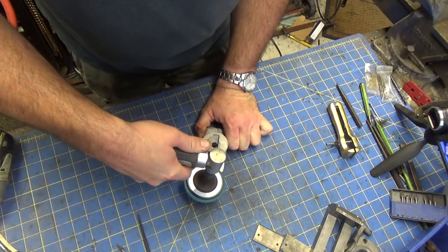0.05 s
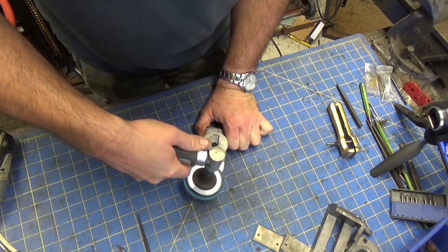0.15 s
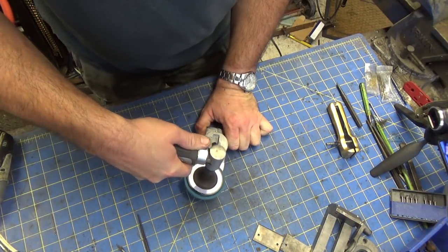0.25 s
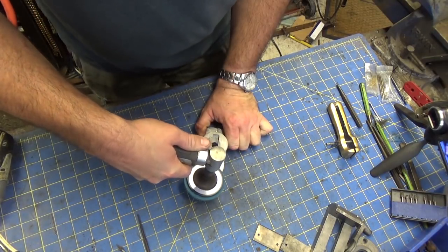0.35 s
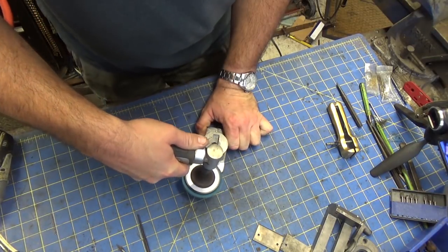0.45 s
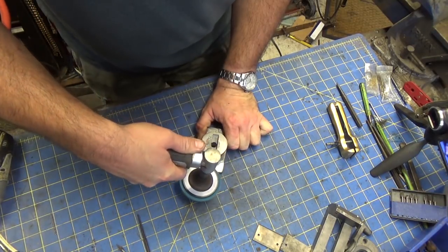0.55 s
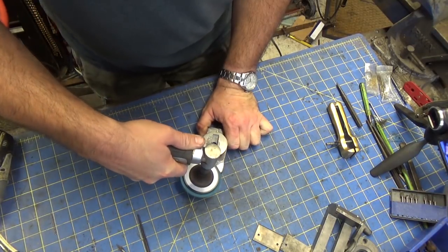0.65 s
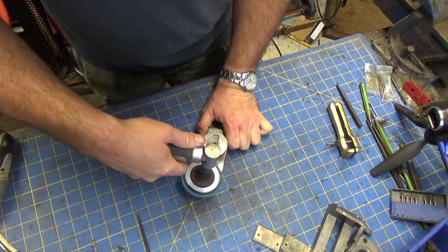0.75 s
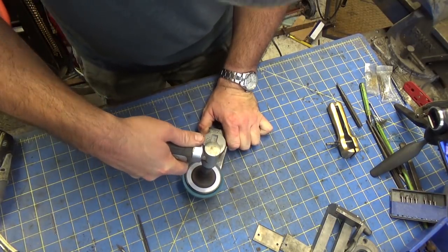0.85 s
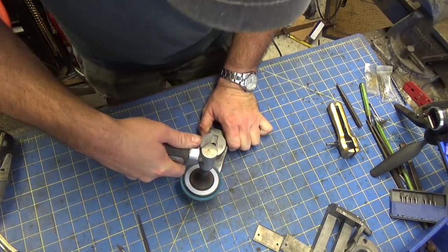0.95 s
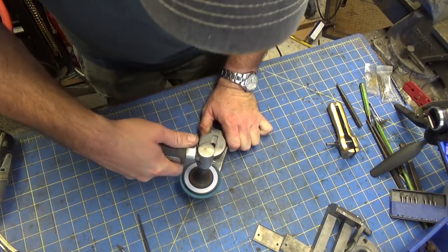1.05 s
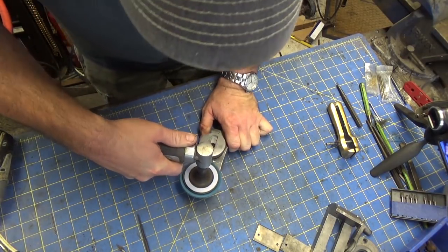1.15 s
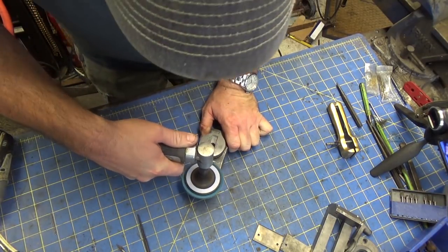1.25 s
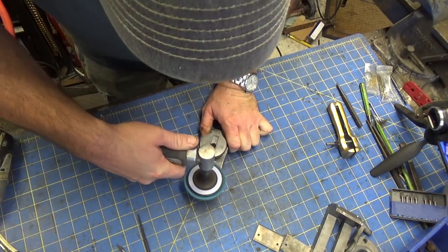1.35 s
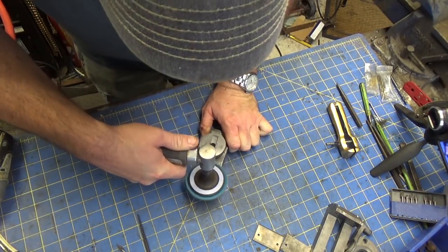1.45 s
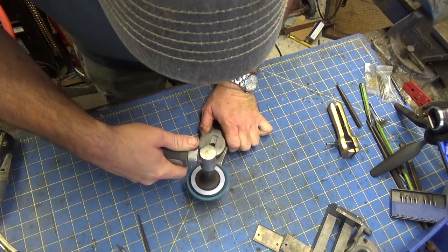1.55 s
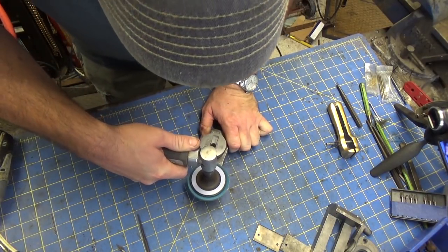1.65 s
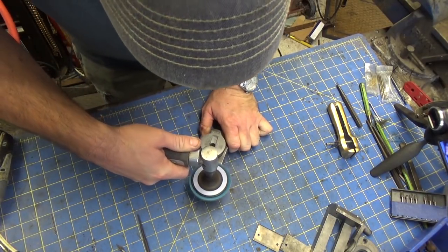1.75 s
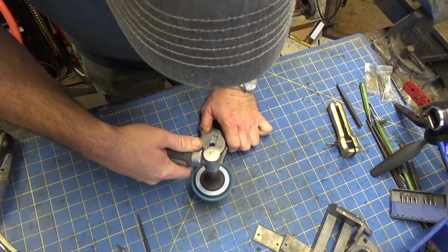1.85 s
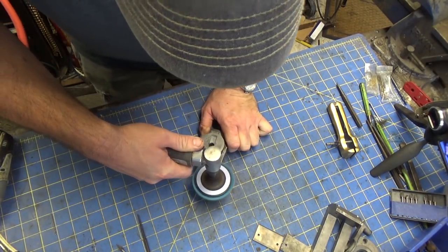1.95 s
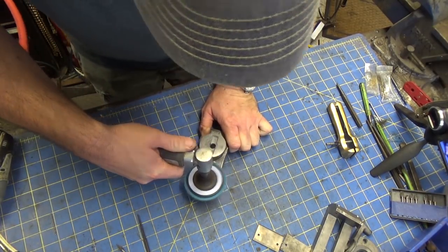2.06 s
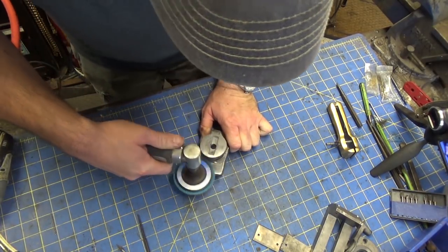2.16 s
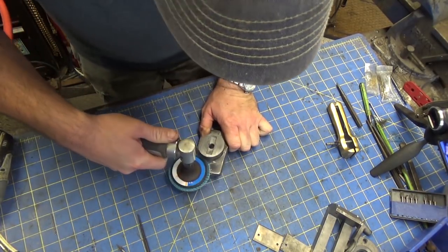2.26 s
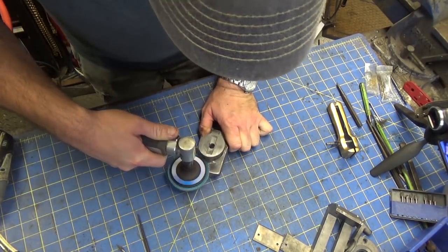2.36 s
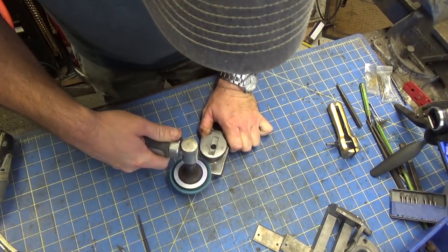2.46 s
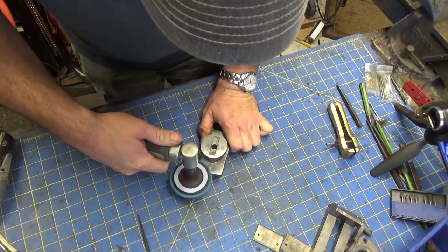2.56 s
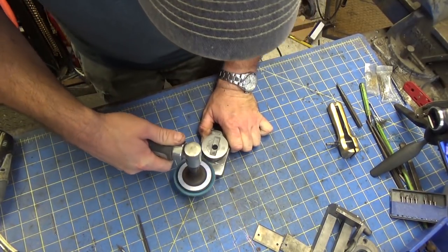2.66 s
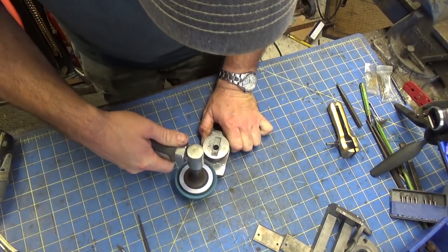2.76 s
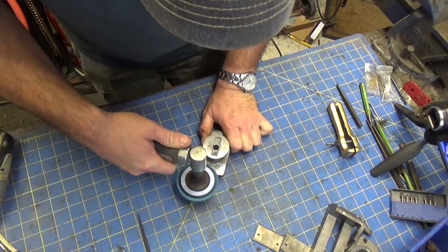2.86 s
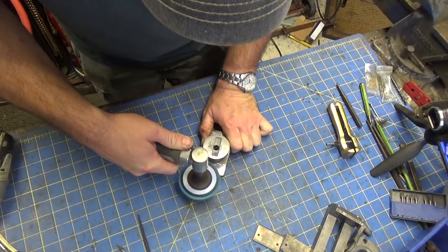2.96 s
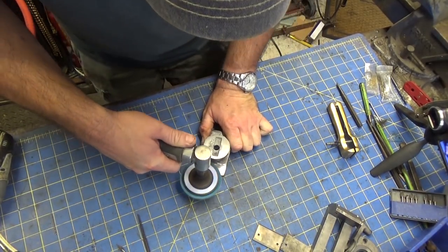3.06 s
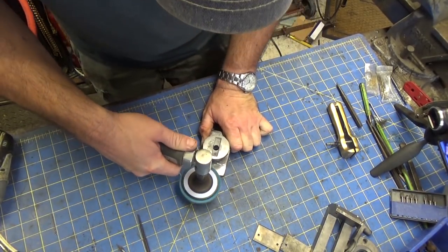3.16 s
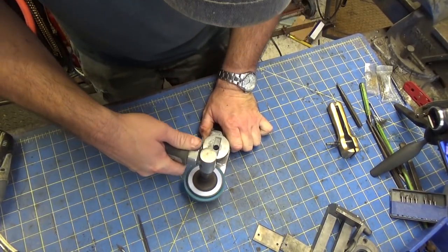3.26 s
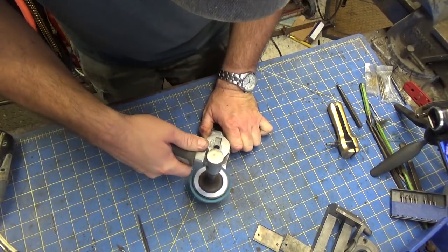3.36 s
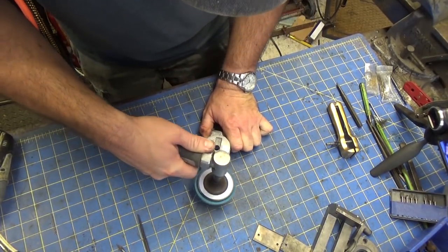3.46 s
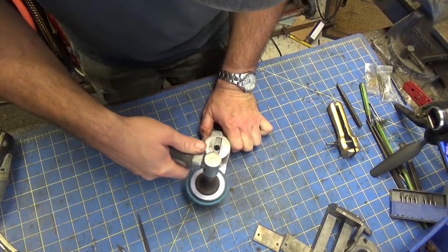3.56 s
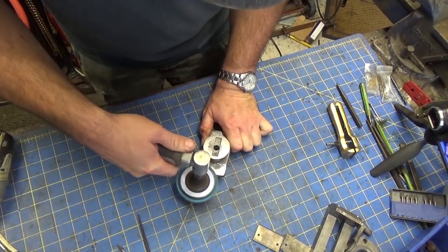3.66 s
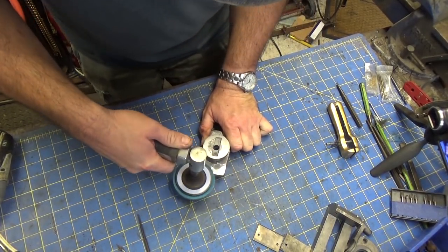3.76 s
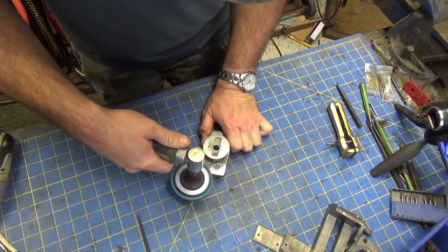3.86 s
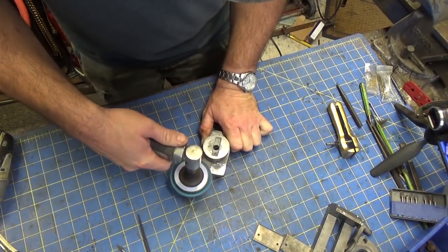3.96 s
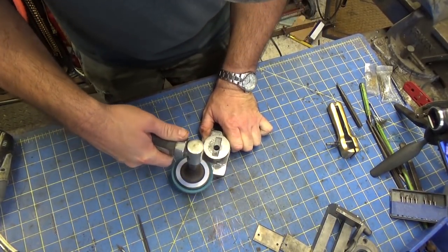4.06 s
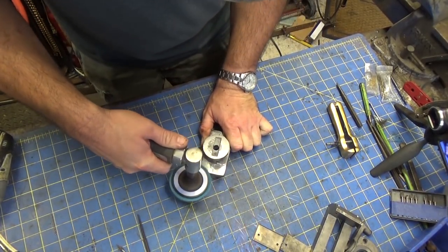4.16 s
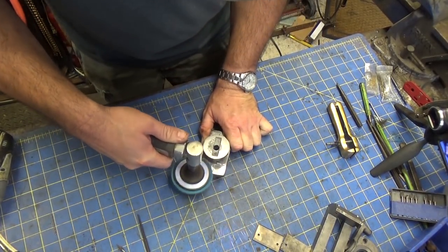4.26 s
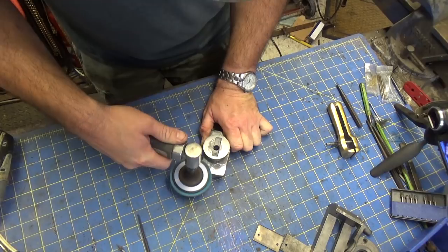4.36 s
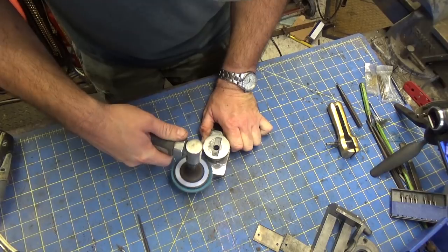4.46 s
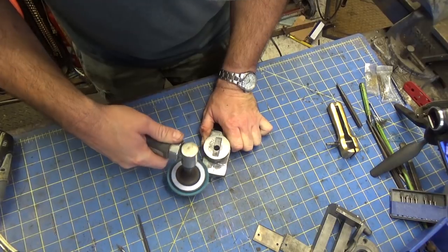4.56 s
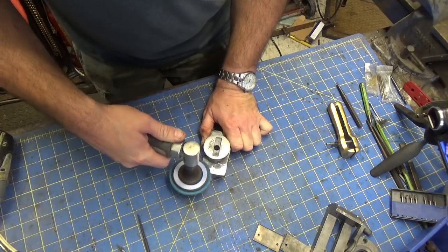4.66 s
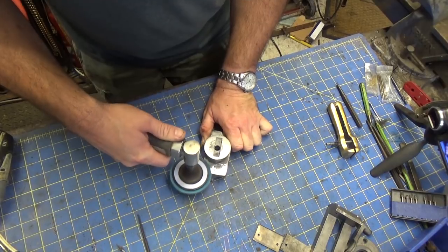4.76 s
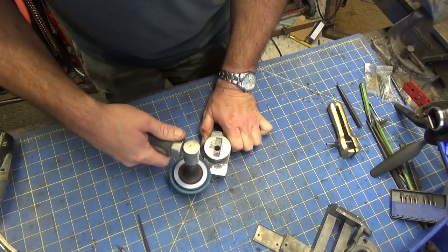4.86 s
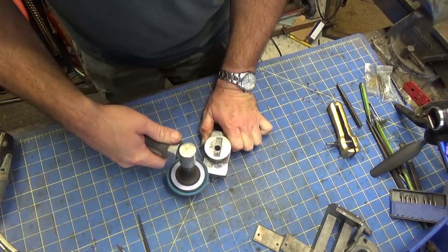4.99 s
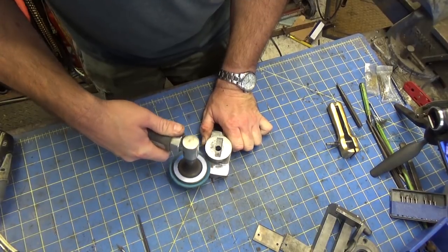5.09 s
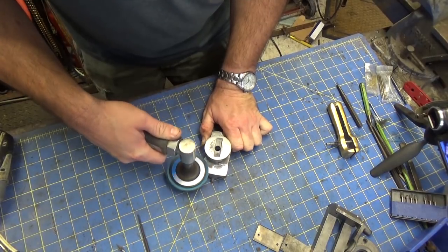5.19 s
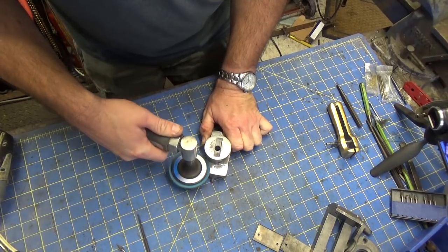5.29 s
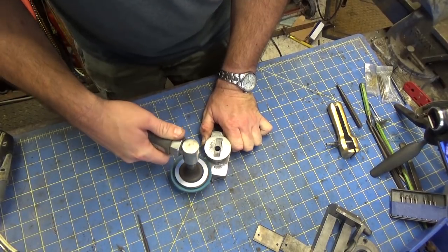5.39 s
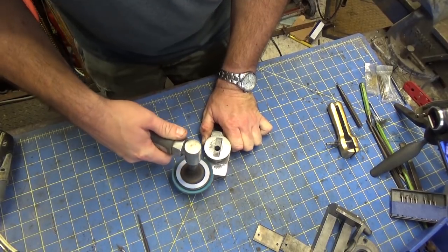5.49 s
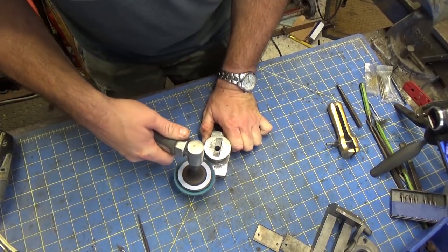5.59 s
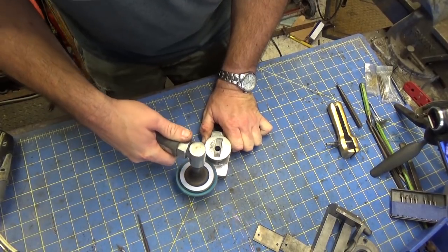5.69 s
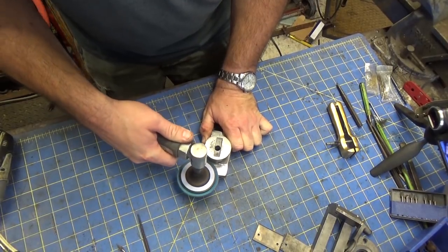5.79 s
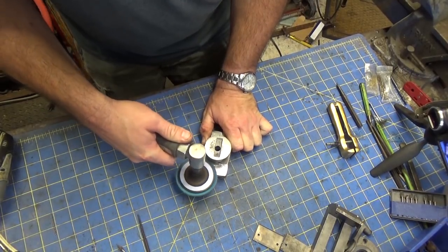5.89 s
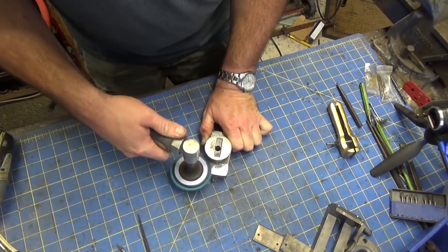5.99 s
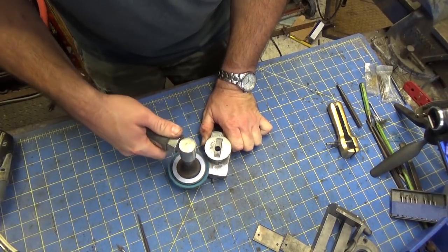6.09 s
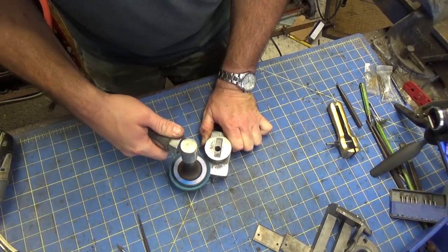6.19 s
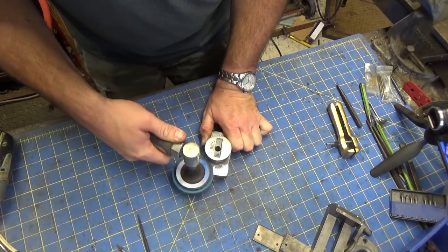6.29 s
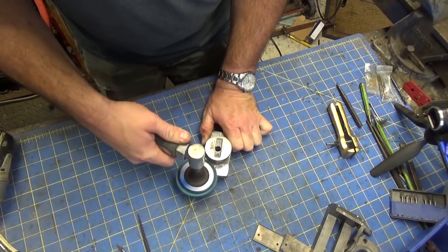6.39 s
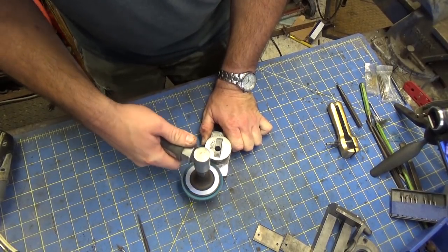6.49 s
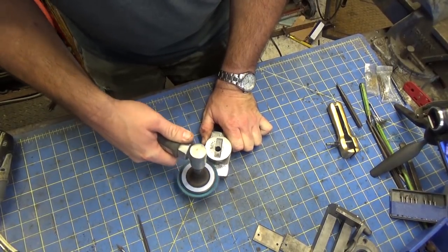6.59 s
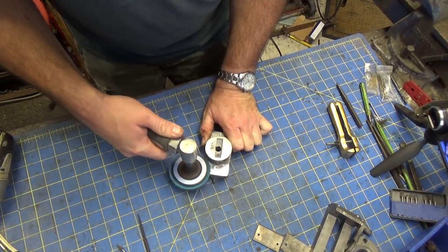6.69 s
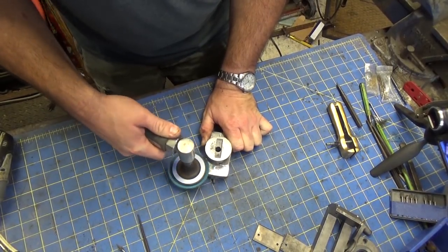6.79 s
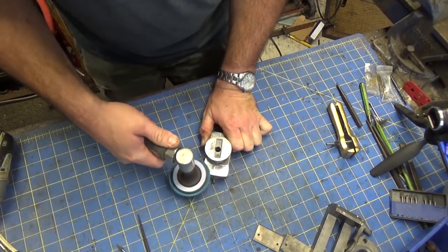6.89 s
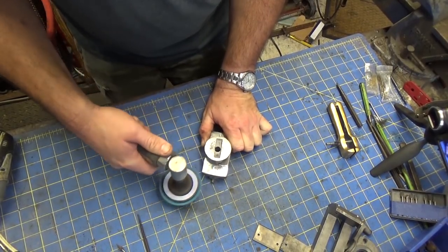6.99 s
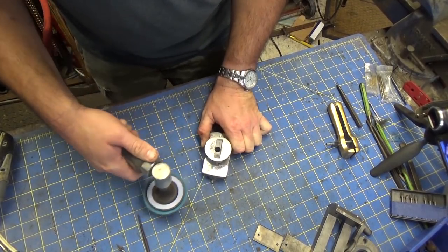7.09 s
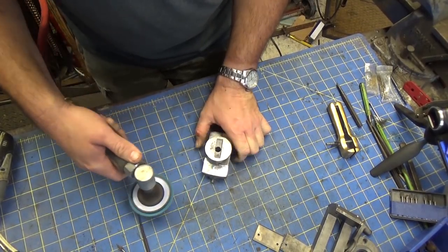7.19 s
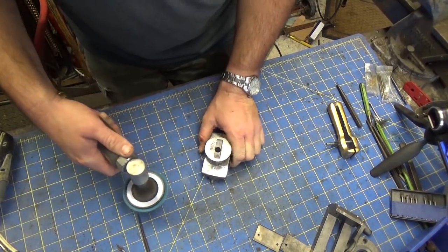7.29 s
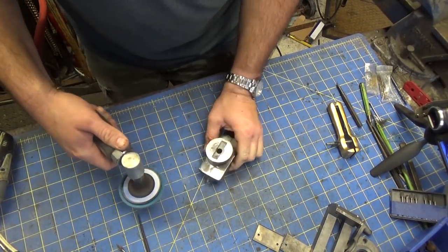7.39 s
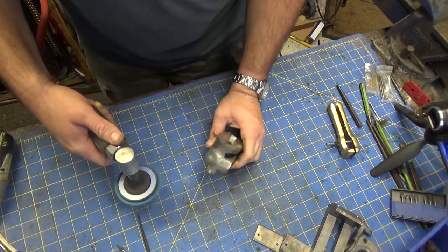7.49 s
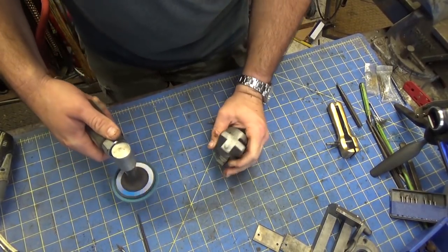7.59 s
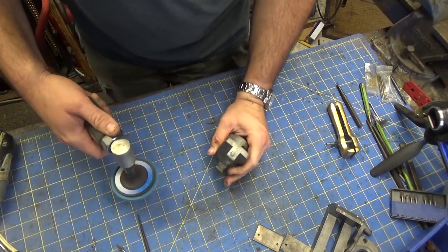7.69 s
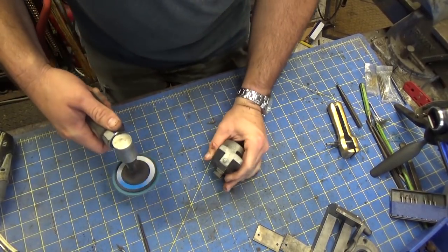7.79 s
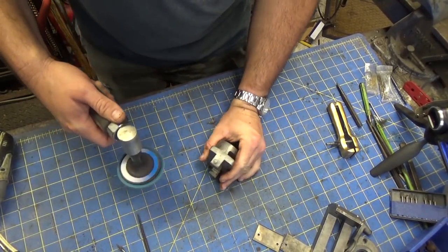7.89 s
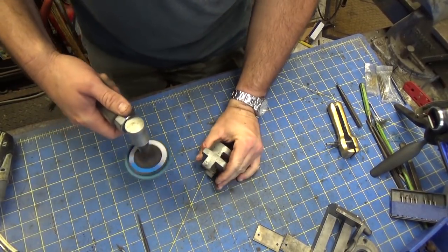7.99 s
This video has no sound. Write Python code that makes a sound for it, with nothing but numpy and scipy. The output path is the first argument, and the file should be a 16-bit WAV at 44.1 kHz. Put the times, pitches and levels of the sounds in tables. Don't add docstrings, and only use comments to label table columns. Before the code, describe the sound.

From 0 s an air grinder is already running close to the microphones on a workshop bench: a dominant, bright, broad hiss of exhaust with a midrange whine beneath. The pitch drops sharply around 0.3 s, recovers by about 1 s, then sags again near 1.5 to 1.8 s. A deep, labouring plunge comes at 2.3 s, with shallower wavering from 2.5 to 4.7 s. Another heavy plunge hits at 5.2 s, then more quick dips from 6.2 to 7 s. Gritty metal scouring accompanies this, over low rumble and soft bench shakes. The hiss shifts subtly in colour as hands move. At about 7.1 s the air shuts off suddenly, with a short bleed of hose air. The whine glides downward and fades, with airy disc whir, a brief ring near 7.35 s and increasingly distinct small vane ticks until 8 s, as quiet workshop rumble remains.

```python
import sys
import numpy as np
from scipy import signal
from scipy.fft import rfft, irfft
from scipy.io import wavfile
from scipy.ndimage import uniform_filter1d, map_coordinates

SR = 44100
rng = np.random.default_rng(int(sys.argv[2]) if len(sys.argv) > 2 else 0)


def waveform_to_disk(signal):
    frames = np.transpose(np.atleast_2d(signal))
    scaled = np.clip(frames, -1, 1) * 32767
    samples = np.round(scaled).astype(np.int16)
    wavfile.write(sys.argv[1], SR, samples)


def gain_from_db(level_db):
    decades = np.asarray(level_db, float) / 20
    return 10 ** decades


N = 354547
T = np.arange(N) / SR
RELEASE_S = 7.11
WHINE_DB, CUT_DB = -34.5, -30.5


def unit(x):
    return x / np.sqrt(np.mean(x ** 2) + 1e-20)


def along(points, hz):
    f, v = np.transpose(points)
    return np.interp(np.log(hz + 1), np.log(f + 1), v)


def curves(rows, t=T):
    s, *cols = np.transpose(rows)
    return [np.interp(t, s, c) for c in cols]


def bump(x, centre, width):
    return np.exp(-((x - centre) / width) ** 2)


def spots(rows, hz, t):
    return sum(db * bump(t, s, length) * bump(hz, centre_hz, width)
               for s, length, centre_hz, width, db in rows)


def wobble(rate):
    knots = rng.standard_normal(int(N / SR * 400))
    return map_coordinates(knots, [T * min(rate, 390)])


def patches(shape, bins, frames):
    field = rng.standard_normal(shape)
    for axis, size in enumerate([bins, frames]):
        field = uniform_filter1d(field, size, axis)
        field = uniform_filter1d(field, size, axis)
    return unit(field)


# frequency_hz, side_minus_mid_db
STEREO_SPREAD = [(60, -26), (99, -22), (160, -17), (270, -10), (450, -12), (740, -4.5), (1220, -5.5),
                 (2010, -12), (3330, -20.5), (5500, -13), (9080, -17.5), (15000, -34.5)]


def rush(spectrum, shading=lambda hz, t: 0, ripple_db=2, patchy_db=1.5):
    hz, t, z = signal.stft(rng.standard_normal((2, N)), SR, nperseg=1024)
    hz = hz[:, None]
    ripple = ripple_db * patches(z.shape[1:], bins=2, frames=60)
    ripple = ripple + patchy_db * patches(z.shape[1:], bins=8, frames=20)
    z = z * gain_from_db(along(spectrum, hz) + ripple)
    z = z * [np.ones_like(hz), gain_from_db(along(STEREO_SPREAD, hz))]
    scale = np.sqrt(np.mean(signal.istft(z[0], nperseg=1024)[1] ** 2))
    mid, side = signal.istft(z * gain_from_db(shading(hz, t)), nperseg=1024)[1][:, :N] / scale
    return np.array([mid + side, mid - side])


# peak_s, sag_semitones, lean_in_s, let_up_s
PRESSES = [(0.141, 9.1, 0.201, 0.082), (0.292, 13.5, 0.15, 0.033), (0.356, 16.8, 0.055, 0.28),
           (0.509, 6.6, 0.025, 0.34), (0.92, 2.16, 0.103, 0.58), (1.564, 9.5, 0.166, 0.11),
           (1.775, 5.25, 0.071, 0.15), (2.134, 6.53, 0.65, 0.087), (2.281, 23.3, 0.096, 0.32),
           (2.316, 19.1, 0.036, 0.14), (2.493, 6.75, 0.022, 0.074), (2.92, 3.92, 0.185, 0.073),
           (3.164, 5, 0.144, 0.068), (3.263, 5.8, 0.071, 0.36), (3.774, 3.49, 0.108, 0.35),
           (4.169, 1.82, 0.055, 0.65), (4.694, 2.95, 0.14, 0.036), (4.875, 5.6, 0.162, 0.068),
           (5.123, 11.2, 0.2, 0.045), (5.217, 25.8, 0.047, 0.267), (5.414, 6.83, 0.155, 0.036),
           (5.536, 9.9, 0.111, 0.27), (5.86, 4.24, 0.09, 0.19), (6.122, 4.35, 0.114, 0.073),
           (6.231, 10.3, 0.108, 0.023), (6.273, 17.5, 0.034, 0.24), (6.489, 10.8, 0.129, 0.23),
           (6.774, 8.3, 0.097, 0.052), (6.878, 13.49, 0.084, 0.064), (7.001, 8.9, 0.097, 0.07)]


def rotor():
    free_hz, stall_hz = 700, 119.9
    stall_db, spent_db = -18, -52
    coast_semitones_per_s, fade_s = 43.5, 0.24
    sag = sum(depth * bump(T, s, np.where(T < s, lean_in, let_up))
              for s, depth, lean_in, let_up in PRESSES)
    after = np.clip(T - RELEASE_S, 0, 1)
    vane_hz = free_hz * 2 ** (-(sag + coast_semitones_per_s * after) / 12)
    running_db = WHINE_DB + stall_db / (1 + (vane_hz / stall_hz) ** 8)
    coasting_db = spent_db + (CUT_DB - spent_db) * bump(after, 0.051, fade_s)
    blend = np.clip(after / 0.063, 0, 1)
    whine_db = (1 - blend) * running_db + blend * coasting_db
    vane_hz = vane_hz * (1 + .009 * wobble(30))
    phase = 2 * np.pi * np.cumsum(vane_hz) / SR
    return vane_hz, phase, whine_db


# time_s, level_db
JET_LEVEL = [(0.0, -12.5), (0.08, -15), (0.61, -15.5), (0.75, -14.5), (1.89, -16), (1.93, -15),
             (2.51, -18.5), (2.82, -14.5), (3.24, -16.5), (4.34, -14), (5.39, -18.5), (5.53, -18.5),
             (6.79, -18), (7.09, -17.5)]
# frequency_hz, density_db_per_hz
JET_SPECTRUM = [(880, -47.5), (1500, -29), (1760, -27.5), (2740, -20.5), (3900, -15), (4430, -15),
                (6910, -10.5), (8750, -2), (9650, 0.5), (11100, -4.5), (12000, -9), (15000, -18),
                (15750, -25), (15950, -45)]
# frequency_hz, width_hz, gain_db
BODY_RIDGES = [(1770, 50, 4), (2040, 50, 3), (3160, 50, 3), (3410, 40, 3), (3840, 60, 3), (4120, 40, 3),
               (4670, 60, 3), (5140, 50, 3), (6300, 50, 3), (6610, 80, 3), (6850, 50, 3), (8130, 70, 3)]
# centre_s, length_s, frequency_hz, gain_db
HAND_REFLECTIONS = [(0.36, 0.54, 11200, -5), (0.63, 2.1, 6400, 4), (1.15, 0.65, 5000, 4.5),
                    (.3, .5, 12400, -5), (1.9, 1.1, 12500, 7.5), (1.7546, 1.2, 13400, -2),
                    (1.47, 0.5, 9100, -4.5), (1.75, .5, 14900, 5), (2.47, 0.24, 8500, 3.5),
                    (2.7, .2, 10900, 0.5), (2.97, 0.38, 14500, 9), (3.399, 0.23, 12000, 2),
                    (4, 0.26, 15000, 2), (4.03, 0.51, 12400, 3), (4.9, 0.33, 9300, 4),
                    (5.738, 0.7, 9835, 4), (5.9, 0.5, 7900, 5), (5.9, 0.26, 12600, 8),
                    (6.5, 0.75, 8640, 5.5), (7.5, .3, 9000, 11), (5.8, 1.6, 3930, 4.5),
                    (2.25, 0.26, 9800, 1.5), (5.39, 0.51, 6610, -3), (2.37, .3, 6490, -5),
                    (6.16, 0.39, 7640, -2), (2.46, 1.8, 3720, 3.5), (2.9, .3, 14400, -8),
                    (7.0, 0.19, 10400, 4.5)]


def jet(vane_hz, phase):
    def shading(hz, t):
        swing_db = curves(JET_LEVEL, t)[0] - curves(JET_LEVEL)[0].mean()
        body_db, top_db = -0.99 - swing_db, -swing_db
        top_db = top_db - 8 * np.clip((t - RELEASE_S) / 0.042 + 1, 0, 1)
        ends = body_db / (1 + (hz / 7200) ** 8) + top_db / (1 + (12500 / (hz + 1)) ** 12)
        ridges = sum(db * bump(hz, centre_hz, width) for centre_hz, width, db in BODY_RIDGES)
        width_hz = 340
        glints = [(s, length, centre_hz, width_hz, db) for s, length, centre_hz, db in HAND_REFLECTIONS]
        return ridges + ends + spots(glints, hz, t)

    labour = np.clip(250 / vane_hz, 0, 1.3) * (vane_hz > 110)
    chop = 1 + 0.14 * labour * np.sin(phase)
    after = np.clip(T - RELEASE_S + 0.0031, 0, 1)
    valve = 0.79 * gain_from_db(-60 * after / 0.065) + 0.21 * gain_from_db(-60 * after / 0.5)
    level_db = curves(JET_LEVEL)[0] + .5 * wobble(12) + 0.043 * wobble(120)
    hiss = rush(JET_SPECTRUM, shading, ripple_db=1.96, patchy_db=0.41)
    return gain_from_db(level_db + np.array([[.6], [.35]])) * valve * chop * hiss


def walls(x, t60=0.21):
    t = np.arange(SR // 3) / SR
    tail = rng.standard_normal((2, len(t))) * gain_from_db(-60 * t / t60) * (t > .004)
    tail[1] = 1.36 * tail[0] + 0.087 * tail[1]
    return signal.fftconvolve(x, tail / np.linalg.norm(tail[0]), axes=1)[:, :N]


# multiple_of_vane_rate, level_db
ORDERS = [
    (.25, -33),
    (.5, -20.5),
    (1, -1),
    (4, -20.5),
    (5, -28),
]
# frequency_hz, gain_db
BENCH_RESPONSE = [(80, -26), (150, -10.5), (250, -5), (310, -2), (350, -10), (430, -3), (540, 2),
                  (588, -0.5), (620, -17.5), (690, -4), (1000, -14), (1250, -2), (1450, -5), (1800, 1.5),
                  (2600, -11)]
# frequency_hz, db_under_whine
SECOND_ORDER = [(280, -15), (500, -7), (660, -17), (800, -13), (1060, -17), (1180, -19), (1260, -10),
                (1400, -29)]
# frequency_hz, db_under_whine
THIRD_ORDER = [(450, -12), (660, -17), (800, -15), (1020, -25.5), (1300, -13), (1560, -19), (1770, -11.5),
               (2000, -17)]
# time_s, upper_orders_db
HOUSING_TILT = [(0, 0.5), (1.2, 2.5), (1.5, 1), (4.5, 2), (4.7, -2), (5.4, 0), (6.2, -1), (6.45, 0.5),
                (7.1, 0.5)]


def whine(vane_hz, phase, whine_db):
    coasting = np.clip((T - RELEASE_S) / 0.02, 0, 1)
    levels = {}
    for order, db in ORDERS:
        released_db = 14 * coasting * (order > 1)
        levels[order] = whine_db + db + released_db + along(BENCH_RESPONSE, order * vane_hz)

    octaves_per_s = np.abs(uniform_filter1d(np.gradient(np.log2(vane_hz)), size=3000)) * SR
    glide = octaves_per_s / 3
    blur_db = curves(HOUSING_TILT)[0] - 8 * glide / (1 + glide)
    slower_fade = 0.26
    for order, shell, coasting_db in [(2, SECOND_ORDER, -16), (3, THIRD_ORDER, -14.5)]:
        loaded_db = (1 - coasting) * (along(shell, order * vane_hz) + blur_db)
        free_db = coasting * (coasting_db + slower_fade * (CUT_DB - whine_db))
        levels[order] = whine_db + loaded_db + 1.2 * wobble(7) + free_db

    lag = np.array([[.1], [-.1]])
    tone = 0
    for order, db in levels.items():
        flutter_db = (1.04 + 1.1 * (order > 1)) * wobble(28)
        tone = tone + gain_from_db(db + flutter_db) * np.sin(order * phase + lag)
    return np.sqrt(2) * (tone * gain_from_db([[-.2], [.2]]) + gain_from_db(-12.5) * walls(tone))


# frequency_hz, density_db_per_hz
SCOUR_SPECTRUM = [(88, -35), (150, -23), (357, -5.5), (564, -6), (655, -12), (1310, -3), (1440, -5.5),
                  (2080, 1), (2300, -7.5), (2990, -4.5), (5060, -120)]
# time_s, level_db
BITE = [(0, -1), (.9, 0), (1.6, -2), (2.15, 3.5), (2.35, -3), (3, -0.5), (3.6, -1), (5, 1), (5.3, -4.5),
        (6.1, 1.5), (6.4, -2), (7, 1)]


def roar():
    level_db = -41 + curves(BITE)[0] + 1.2 * wobble(6)
    fade_db = -60 * np.clip(T - RELEASE_S, 0, 1) / 0.43
    return gain_from_db(level_db - 2.5 + fade_db) * rush(SCOUR_SPECTRUM, ripple_db=4, patchy_db=1)


# frequency_hz, density_db_per_hz
SHOP_SPECTRUM = [(71, -48), (120, -9.5), (328, -6.5), (409, -12.5), (475, -2.5), (585, -5), (664, -7.5),
                 (983, -7.5), (1070, -9), (1900, -21), (2470, -61), (4180, -120)]
# frequency_hz, density_db_per_hz
BENCH_SPECTRUM = [(20, -24), (40, -11), (70, -6), (120, 0), (170, -5.5), (300, -42), (600, -120)]
# time_s, lift_db
BENCH_JOLTS = [
    (.69, 2),
    (2.01, 4),
    (2.42, -2),
    (4.36, 5),
    (6.09, 7),
    (7.95, 8),
]


def shop():
    jolts_db = sum(db * bump(T, s, .08) for s, db in BENCH_JOLTS)
    bench = gain_from_db(-62 + jolts_db) * rush(BENCH_SPECTRUM, ripple_db=0, patchy_db=0)
    return gain_from_db(-48.0 + wobble(2.89)) * rush(SHOP_SPECTRUM, ripple_db=1.5, patchy_db=2) + bench


# time_s, level_db
COAST_LEVEL = [
    (7.08, -17),
    (7.104, -17),
    (7.116, -31),
    (7.194, -32),
    (7.34, -34),
    (7.588, -40.5),
    (8.04, -48.5),
]
# frequency_hz, density_db_per_hz
HOUSING_SPECTRUM = [(880, -34), (1500, -8), (2200, -8.5), (2930, 0.5), (3360, -6.5), (4140, -5.5),
                    (5400, 0.5), (7260, -5.5), (9280, -0.5), (11900, -9.5), (13100, -20), (15800, -26)]
# centre_s, length_s, frequency_hz, width_hz, gain_db
HOUSING_SINGS = [
    (7.35, 0.078, 2990, 60, 13.5),
    (7.33, 0.12, 8700, 380, 10),
    (7.6, 0.069, 5720, 350, 3),
    (7.56, 0.057, 9400, 510, 6),
    (7.16, 0.056, 5600, 2900, 1.5),
    (7.92, 0.089, 5400, 860, -2),
]
# frequency_hz, gain_db
TICK_SPECTRUM = [(2500, -60), (3700, -23), (4600, 2), (5400, 0), (6300, -6), (7500, -25), (11000, -33.5)]


def coast(phase):
    wind = rush(HOUSING_SPECTRUM, lambda hz, t: spots(HOUSING_SINGS, hz, t), ripple_db=2.8, patchy_db=1.7)
    passes = phase / (2 * np.pi)
    strength = gain_from_db(4.1 * rng.standard_normal(N // 20))[passes.astype(int)]
    ticks = strength * np.exp(-6 * (passes % 1)) * rng.standard_normal(N)
    colour = gain_from_db(along(TICK_SPECTRUM, np.fft.rfftfreq(N, 1 / SR)))
    ticks = unit(irfft(rfft(ticks) * colour, N))
    ticks = gain_from_db(-16 + 13.4 * (T - RELEASE_S)) * ticks
    onset = np.clip((T - RELEASE_S) / 0.02, 0, 1)
    lean = gain_from_db([[.3], [-.3]])
    return gain_from_db(curves(COAST_LEVEL)[0] - 1.2) * onset * lean * (wind + ticks)


def scene():
    vane_hz, phase, whine_db = rotor()
    tool = jet(vane_hz, phase) + whine(vane_hz, phase, whine_db) + roar()
    return tool + shop() + coast(phase)


def low_pass(x):
    return signal.sosfilt(signal.butter(12, 16110, fs=SR, output="sos"), x)


def record(dry):
    return low_pass(dry)


dry = scene()
out = record(dry)
waveform_to_disk(out)
```